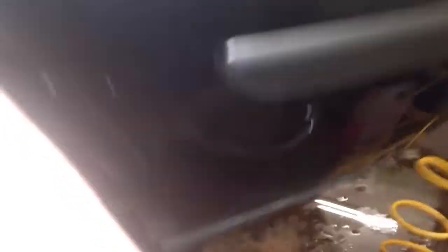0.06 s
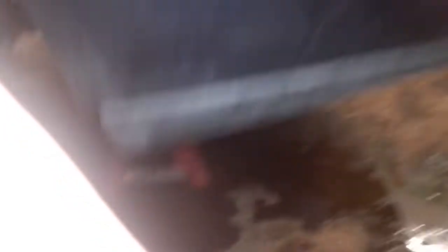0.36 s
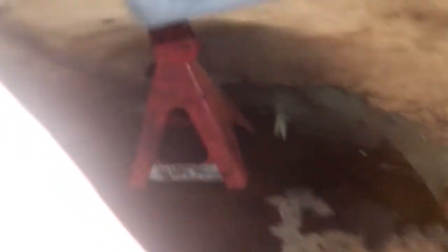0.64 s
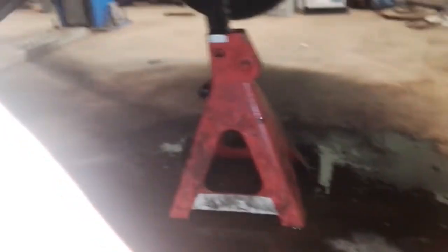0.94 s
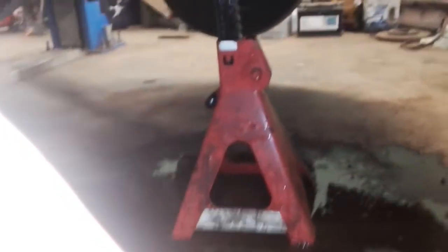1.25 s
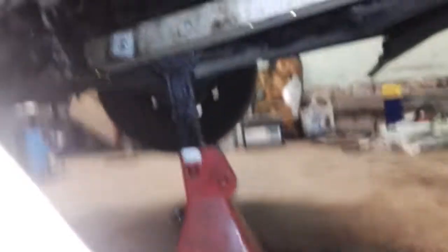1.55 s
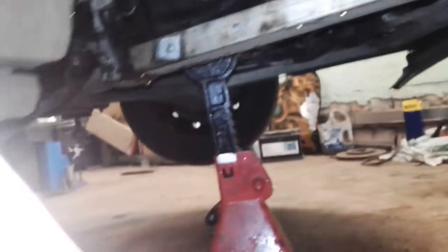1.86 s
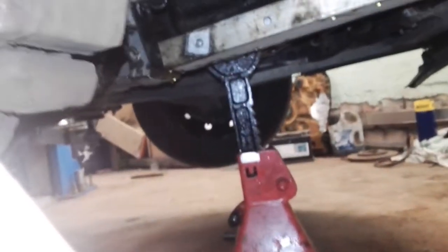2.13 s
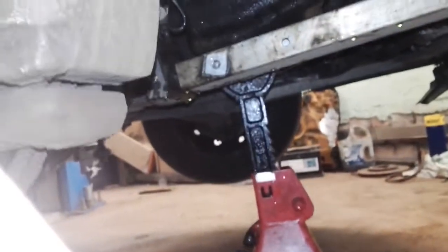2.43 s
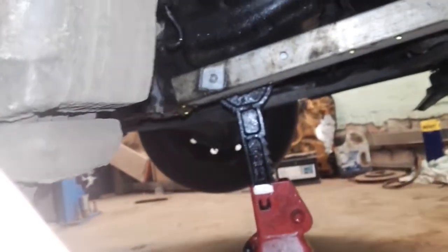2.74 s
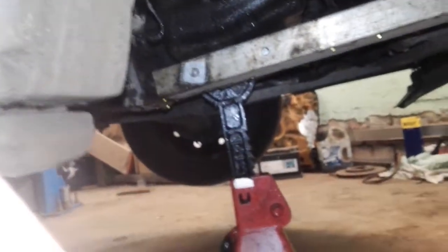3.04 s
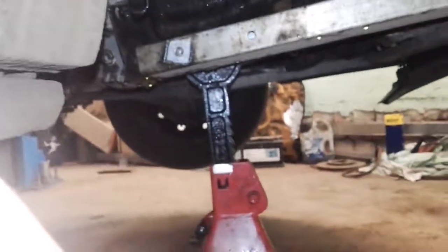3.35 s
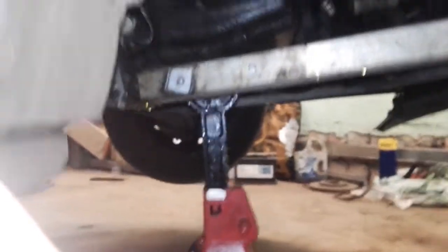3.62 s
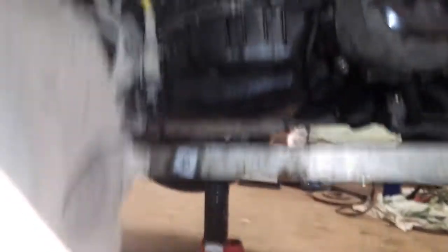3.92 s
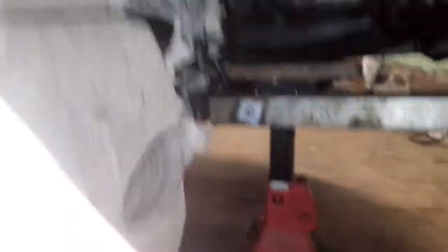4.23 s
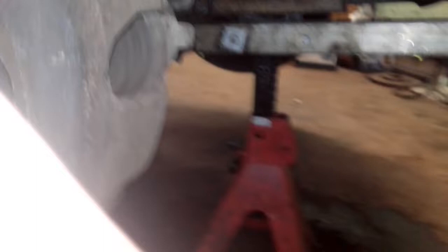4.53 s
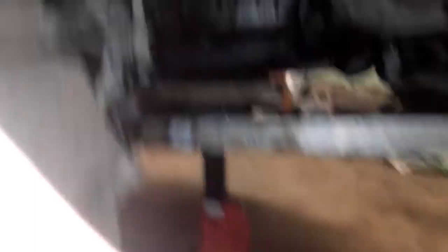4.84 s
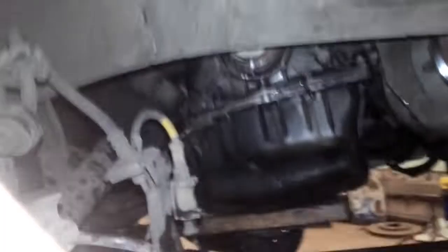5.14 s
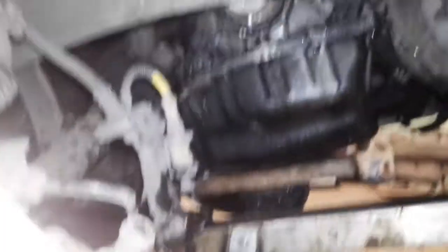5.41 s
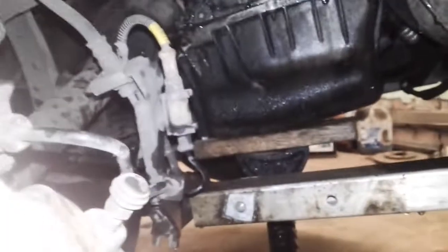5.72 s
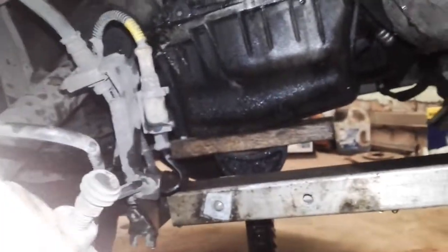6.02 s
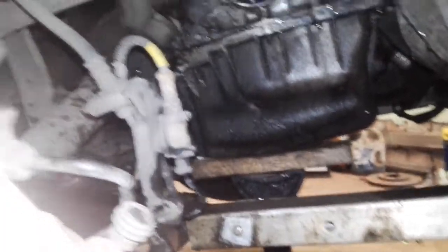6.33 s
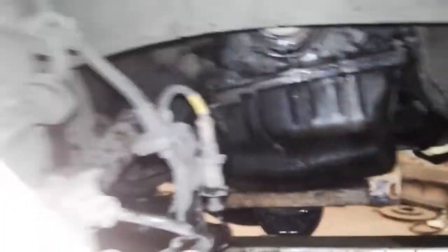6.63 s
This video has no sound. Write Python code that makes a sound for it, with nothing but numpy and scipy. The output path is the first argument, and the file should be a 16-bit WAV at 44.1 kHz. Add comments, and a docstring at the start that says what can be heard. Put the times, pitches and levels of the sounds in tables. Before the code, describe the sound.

A quiet garage workshop is heard from a hand-held microphone moving under a car, with faint room air, hiss and a weak hum throughout. At about 0.1 seconds the plastic camera case gives a short, gritty creak, very close. Soft finger scuffs follow through the first second, with a tiny, faint squeak near 0.5 seconds and a light cloth rustle that slowly fades. At about 1.1 seconds one dry tick comes from a little way off. A sleeve brushes faintly near 2 seconds and again from about 3.7. At 4 seconds a soft bump leads into a hard, blunt knock, by far the loudest sound. It rebounds once clearly, then in a few weaker taps, ringing a hollow panel that dies away by about 4.7 seconds. Only faint sleeve rustle and room air continue until the end, near 7 seconds.

```python
"""A plastic case creaks in the grip, right at the microphone of a hand-held camera moving under a car.
Close by, fingers scuff and squeak and a sleeve rustles with the arm; one dry tick comes from a little
way off. About four seconds in, a soft bump leads to a hard knock that rebounds and rings a hollow panel.
The place is a quiet garage workshop: faint room air, a weak hum and microphone hiss lie beneath."""
import sys
import numpy as np
from scipy import signal
from scipy.fft import rfft, irfft
from scipy.io import wavfile
from scipy.ndimage import uniform_filter1d

SR = 44100
rng = np.random.default_rng(int(sys.argv[2]) if len(sys.argv) > 2 else 0)


def inscribe(sig):
    """Save sig as 16-bit PCM at rate SR to the path in sys.argv[1].

    A 1-D sig is mono; a 2-D sig holds one channel per row.
    Samples are clipped to [-1, 1] before scaling.
    """
    pcm = np.round(np.clip(np.atleast_2d(sig).T, -1, 1) * 32767)
    wavfile.write(sys.argv[1], SR, pcm.astype(np.int16))


N = 302967
TIME = np.arange(N) / SR

# workshop air and microphone hiss: (frequency [Hz], relative level [dB])
AIR_COLOUR = [(20, -11.5), (40, -14), (78, -15.5), (102, -2.5), (130, -12.5), (165, -4), (200, -3.5),
              (330, -7.5), (500, -4.5), (680, -8), (1200, -11), (2300, -18), (6500, -27.5), (13000, -21),
              (16000, -25)]
# partials of the workshop hum: (frequency [Hz], level [dB])
HUM_PARTIALS = [(474, -84.5), (585, -87), (754, -87), (1130, -87.5)]
# moves of the arm and grip: (start [s], attack [s], t60 [s], cloth level [dB], hiss level [dB])
ARM_MOVES = [(0, 0.01, 9.1, -61, -71.5), (.015, 0.082, 0.13, -58, -57), (3.75, 0.36, 2.84, -59, -75.5),
             (4.7, 0.56, 2, -68, -87), (6.0, 0.89, 4.3, -70, -81.5)]
# rustling cloth: (frequency [Hz], relative level [dB])
CLOTH_COLOUR = [(80, -42.5), (150, -14.5), (220, -1), (300, -1.5), (500, 0.5), (800, -4), (1170, -3.5),
                (1600, -5.5), (2300, -8.5), (3300, -14.5), (4600, -28), (8000, -28.5), (16000, -22)]
# bright hiss of the cloth and of the grip sliding, and after the knocks: (frequency [Hz], relative level [dB])
HISS_COLOUR = [(1000, -21.5), (4000, -0.5), (7000, -10), (11000, -1.5), (16000, -5.5)]
# soft contacts of the hand, and at 4.01 s the soft bump that leads into the knock: (time [s], level [dB],
# centre [Hz], width [octaves], t60 [s])
SOFT_BUMPS = [(.019, -38.5, 550, 1.12, 0.033), (.040, -52, 7200, .15, .045),
              (0.354, -52.5, 1500, 1.1, 0.04), (.411, -45.5, 786, 1.04, 0.04),
              (.508, -59.5, 4000, 2.7, .15), (.529, -48.5, 1120, 0.59, .04),
              (.666, -53.5, 680, 1.03, 0.073), (0.8228, -51.5, 1330, 0.77, .012),
              (.867, -47.5, 1260, .3, 0.021), (1.17, -54.5, 350, 1.4, .06), (4.014, -35, 1303, .7, 0.071),
              (4.014, -39, 235, .55, 0.14), (4.023, -33, 420, .55, .04)]
# snaps of the case in the grip: (time [s], level [dB], centre [Hz], width [octaves])
CASE_SNAPS = [(.0930, -25.5, 2520, 0.56), (.0950, -35, 7000, 0.53), (0.1022, -18.5, 1040, 1.55),
              (0.1074, -26, 10500, 0.91)]
# envelope of the grip's squeak: (start [s], attack [s], t60 [s])
SQUEAK_SWELL = (.509, .018, .06)
# partials of that squeak: (frequency [Hz], level [dB])
SQUEAK_PARTIALS = [(4517, -69.5), (11192, -59), (15353, -65)]
# tick a little way off: (time [s], level [dB])
DRY_TICK = (1.0796, -28)
# its spectrum: (frequency [Hz], relative level [dB])
DRY_TICK_COLOUR = [(100, -17), (450, -2.5), (1100, 1.5), (1900, 7), (2800, -0.5), (4200, -1), (6500, -15.5),
                   (10500, -19), (16000, -30)]
# long strokes of something sliding against a hollow object: (start [s], attack [s], t60 [s], level [dB])
HOLLOW_STROKES = [(1.93, 0.081, 0.46, -67.5), (3.331, 0.15, .8, -72.5), (3.67, .16, 2.4, -61.5),
                  (4.57, 0.027, 0.17, -62.5)]
# their hollow spectrum: (frequency [Hz], relative level [dB])
STROKE_COLOUR = [(200, -24.5), (600, -14.5), (950, -6), (1160, 1.5), (1450, -3.5), (1900, -8),
                 (2900, -20.5), (3300, -14.5), (3700, -21), (6000, -36.5), (16000, -35.5)]
# the knock and its rebounds: (time [s], level [dB], tilt [dB/octave])
BLOWS = [(4.1412, -6, 1.5), (4.2478, -19.5, -2), (4.281, -33.5, -2.5), (4.336, -50, -3), (4.345, -38, -4.5)]
# a blow on the panel: (frequency [Hz], relative level [dB])
BLOW_COLOUR = [(50, -50), (110, -30.5), (250, -8), (500, -9.5), (850, -2), (990, -8), (1100, 2.5),
               (1400, 1), (1600, -1.5), (1900, -9.5), (2200, -19.5), (3200, -33), (4200, -50),
               (6000, -60.5), (16000, -66.5)]
# ringing modes of the panel: (frequency [Hz], relative level [dB], t60 [s])
PANEL_MODES = [(102.5, -19.5, 0.36), (203.4, -10, 0.45), (265, -5.5, 0.46), (391.2, -5, 0.25),
               (525, -6.5, 0.41), (593, -3, 0.245), (653, -3.5, 0.21), (755, -12.5, 0.96), (788, -4, 0.39),
               (908, -11.5, 0.2), (1064, 1, 0.21), (1149, -5.5, 0.25), (1206, -1, 0.285),
               (1371, -3.5, 0.15), (1537, -2.5, 0.2), (1730, -8.5, 0.27), (1860, -9.5, .25),
               (2350, -10.5, 0.16), (2690, -22.5, 0.2)]
# echoes off floor and underbody: (delay [s], gain [ratio])
UNDERBODY_ECHOES = [(.00256, 0.1), (.00395, -0.32), (.00639, 0.32), (.00757, 0.12), (.00873, -0.239),
                    (0.0153, 0.15), (0.016, -0.08)]


def amp(db):
    """Decibels to gain."""
    return 10 ** (np.asarray(db) / 20)


def unit_rms(x):
    """Scales to rms 1."""
    return x / np.sqrt(np.mean(x ** 2) + 1e-20)


def level_at(colour, hz):
    """Reads a spectrum in dB on a log-frequency axis."""
    points_hz, db = np.transpose(colour)
    return np.interp(np.log(hz + 1), np.log(points_hz + 1), db)


def add(mix, start, sound):
    """Mixes a sound in at start seconds."""
    part = mix[max(round(start * SR), 0):][:len(sound)]
    part += sound[:len(part)]


def noise(colour):
    """Noise of rms 1 with the given spectrum."""
    gain = amp(level_at(colour, np.fft.rfftfreq(N, 1 / SR)))
    return unit_rms(irfft(rfft(rng.standard_normal(N)) * gain, N))


def drift(top_hz):
    """Random wavering of rms 1, no faster than top_hz."""
    slow = np.fft.rfftfreq(N, 1 / SR) < top_hz
    return unit_rms(irfft(rfft(rng.standard_normal(N)) * slow, N))


def swell(start, attack, t60):
    """An envelope that rises evenly, then dies away."""
    t = TIME - start
    return np.clip(t / attack, 0, 1) * np.exp(-np.log(1000) * np.maximum(t - attack, 0) / t60)


def hump(centre_hz, octaves):
    """A spectrum with one rounded peak and falling skirts."""
    hz = np.geomspace(20, SR / 2, 300)
    return np.c_[hz, -40 * np.log10(1 + (np.log2(hz / centre_hz) / octaves) ** 2 / 2)]


def pulse(colour, tilt_db=0, size=4096):
    """The shortest causal pulse with this spectrum, tilted by tilt_db per octave; peak 1."""
    hz = abs(np.fft.fftfreq(size, 1 / SR))
    log_gain = np.log(amp(level_at(colour, hz) + tilt_db * np.log2(np.maximum(hz, 100))))
    wave = np.fft.ifft(np.exp(np.conj(signal.hilbert(log_gain)))).real  # minimum phase
    return wave / abs(wave).max()


def scatter(t60, rise=0.0026):
    """Dense, colourless reflections that die away; energy about 1."""
    t = TIME[:SR]
    decay = np.exp(-np.log(1000) * t / t60) * (1 - np.exp(-t / rise))
    tail = rng.standard_normal(SR) * decay
    for _ in range(2):  # evens out deep holes in the spectrum
        spectrum = rfft(tail)
        power = uniform_filter1d(abs(spectrum) ** 2, size=400)
        tail = irfft(spectrum / np.sqrt(power), SR)
    return tail * signal.windows.tukey(2 * SR, .5)[SR:]


def garage(x, near_db, near_t60, far_db, far_t60):
    """Close reflections under the car and the longer tail of the workshop beyond."""
    space = amp(near_db) * scatter(near_t60) + amp(far_db) * scatter(far_t60, rise=0.0027)
    return signal.fftconvolve(x, space)[:N]


def room_tone(air_db=-69, waver_db=5.0, wander_rad=0.8):
    """Workshop air with microphone hiss, and a weak hum that wavers in level and phase."""
    hum = np.zeros(N)
    for hz, db in HUM_PARTIALS:
        gain = amp(db + waver_db * drift(3)) * np.sqrt(2)
        hum += gain * np.sin(2 * np.pi * hz * TIME + wander_rad * drift(17))
    return amp(air_db) * noise(AIR_COLOUR) + hum


def arm_rustle(rest_db=-78.5, grain_db=2):
    """Close to the microphone, cloth rubs unevenly as the arm moves, with a bright hiss above it; the grip
    slides hissing just before the creak."""
    cloth_power, hiss_power = amp(rest_db) ** 2, 0
    for start, attack, t60, cloth_db, hiss_db in ARM_MOVES:
        speed = swell(start, attack, t60)
        cloth_power += (amp(cloth_db) * speed) ** 2
        hiss_power += (amp(hiss_db) * speed) ** 2
    cloth = noise(CLOTH_COLOUR) * np.sqrt(cloth_power) * amp(grain_db * drift(77))
    return cloth + noise(HISS_COLOUR) * np.sqrt(hiss_power)


def scuff(hz, octaves, t60):
    """A short cluster of tiny blows through one resonance, peak 1."""
    sound = signal.fftconvolve(scatter(t60, rise=.003), pulse(hump(hz, octaves)))
    return sound / abs(sound).max()


def soft_bumps(fidgets_per_s=2, fidget_db=-72.5):
    """The hand scuffs the camera case, and a soft bump leads into the knock; shifting fingers add faint dull
    thuds at random."""
    direct = np.zeros(N)
    for start, db, hz, octaves, t60 in SOFT_BUMPS:
        add(direct, start, amp(db) * scuff(hz, octaves, t60))
    fidgets = (rng.random(N) < fidgets_per_s / SR).astype(float)
    thud = scuff(hz=237, octaves=0.39, t60=0.22)
    direct += amp(fidget_db) * signal.fftconvolve(fidgets, thud)[:N]
    return direct + garage(direct, near_db=-13.0, near_t60=.1, far_db=-18, far_t60=.55)


def case_creak(grit_db=-3, grit_t60=0.01):
    """The plastic case slips in tiny gritty snaps right at the microphone."""
    snaps = np.zeros(N)
    for start, db, hz, octaves in CASE_SNAPS:
        add(snaps, start, amp(db) * pulse(hump(hz, octaves)))
    grit = amp(grit_db) * signal.fftconvolve(snaps, scatter(grit_t60, rise=.0001))[:N]
    return snaps + grit + garage(snaps, near_db=-11.0, near_t60=0.076, far_db=-16.5, far_t60=0.23)


def grip_squeak(pitch_waver=0.0026):
    """Skin sticks and slips on the case: a few thin wavering partials."""
    warped_s = np.cumsum(1 + pitch_waver * drift(200)) / SR
    tone = sum(amp(db) * np.sqrt(2) * np.sin(2 * np.pi * hz * warped_s) for hz, db in SQUEAK_PARTIALS)
    return tone * swell(*SQUEAK_SWELL)


def tick():
    """One dry tick a little way from the microphone, with a quick spray of reflections."""
    start, db = DRY_TICK
    direct = np.zeros(N)
    add(direct, start, amp(db) * pulse(DRY_TICK_COLOUR))
    return direct + garage(direct, near_db=-1.5, near_t60=0.036, far_db=-8.0, far_t60=0.29)


def hollow_rub():
    """Something slides against a hollow object in longer strokes, each a swell of hollow noise."""
    strokes = sum(amp(db) * swell(start, attack, t60) for start, attack, t60, db in HOLLOW_STROKES)
    return strokes * noise(STROKE_COLOUR)


def panel_knock(ring_db=-32.0, ring_rise_s=0.0018, room_tilt_db=3.5):
    """A blunt blow under the car rebounds: each hit rings the panel and echoes off floor and underbody."""
    t = TIME[:SR]
    ring = sum(amp(db) * np.exp(-np.log(1000) * t / t60) * np.sin(2 * np.pi * hz * t)
               for hz, db, t60 in PANEL_MODES)
    ring *= 1 - np.exp(-t / ring_rise_s)
    direct, into_room, ringing, echoes = np.zeros((4, N))
    for start, db, tilt_db in BLOWS:
        add(direct, start, amp(db) * pulse(BLOW_COLOUR, tilt_db))
        # the treble beams away into the room
        add(into_room, start, amp(db) * pulse(BLOW_COLOUR, tilt_db + room_tilt_db))
        add(ringing, start, amp(db + ring_db) * ring)
    for delay, gain in UNDERBODY_ECHOES:
        add(echoes, delay, gain * direct)
    room = garage(into_room, near_db=-7.5, near_t60=0.072, far_db=-10.0, far_t60=0.51)
    return direct + ringing + echoes + room


def knock_hiss(relative_db=-61, attack=.006, t60=0.86, grain_db=3.0):
    """A faint gritty hiss trails each blow."""
    trail = sum(amp(db + relative_db) * swell(start, attack, t60) for start, db, _ in BLOWS)
    return trail * noise(HISS_COLOUR) * amp(grain_db * drift(120.3))


def scene():
    """Everything as it reaches the one microphone under the car."""
    impacts = panel_knock() + knock_hiss() + tick()
    handling = case_creak() + soft_bumps() + grip_squeak() + arm_rustle() + hollow_rub()
    return (impacts + handling + room_tone())[None]


def record(dry):
    """The camera cuts off the treble above 15.85 kHz."""
    lowpass = signal.firwin(511, 15850, window=("kaiser", 9), fs=SR)
    return signal.oaconvolve(dry, lowpass[None], "same")


dry = scene()
out = record(dry)
inscribe(out)
```